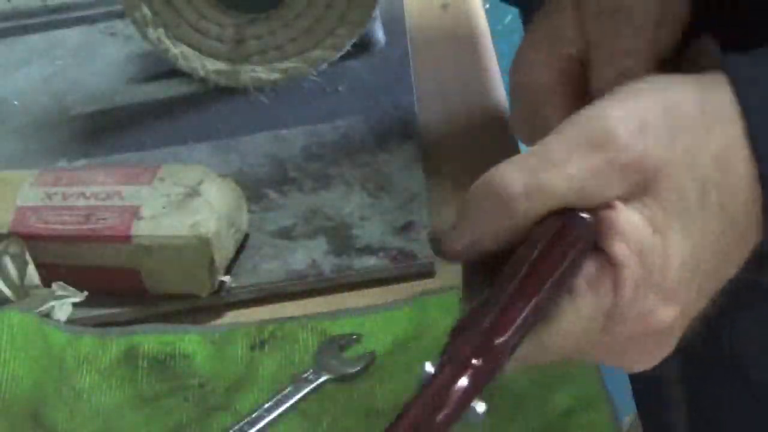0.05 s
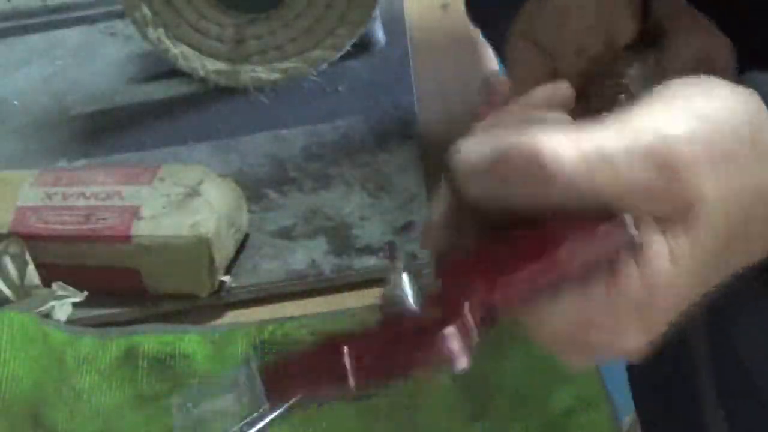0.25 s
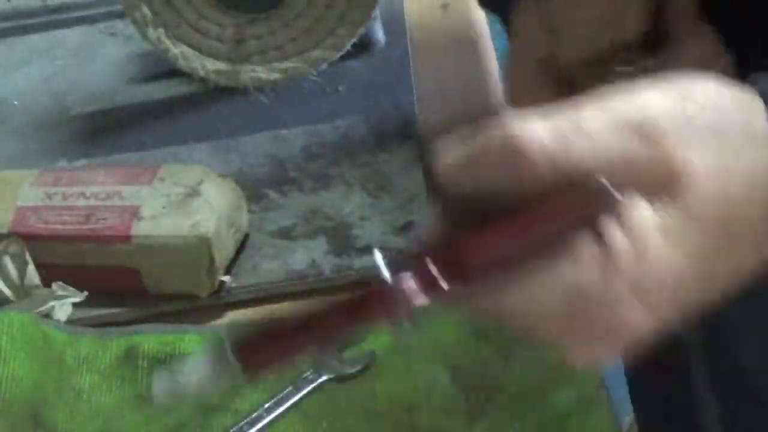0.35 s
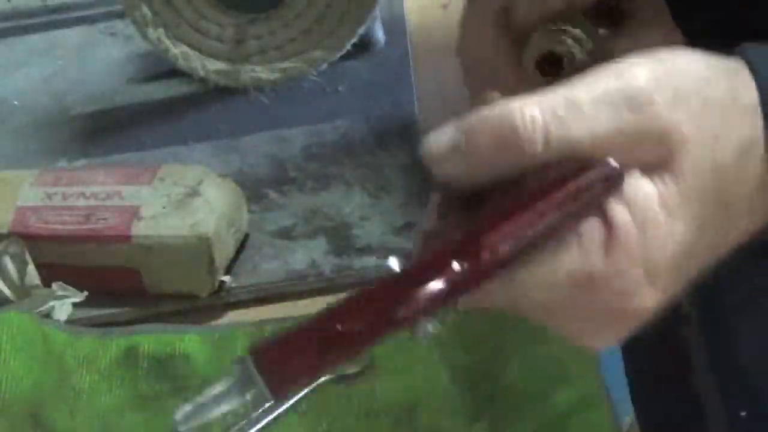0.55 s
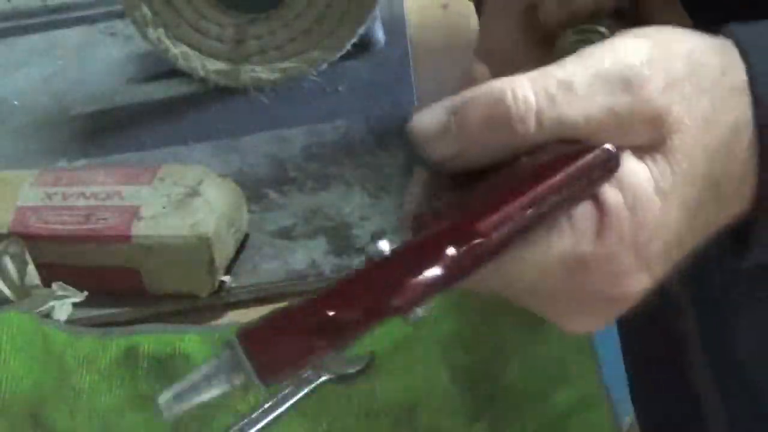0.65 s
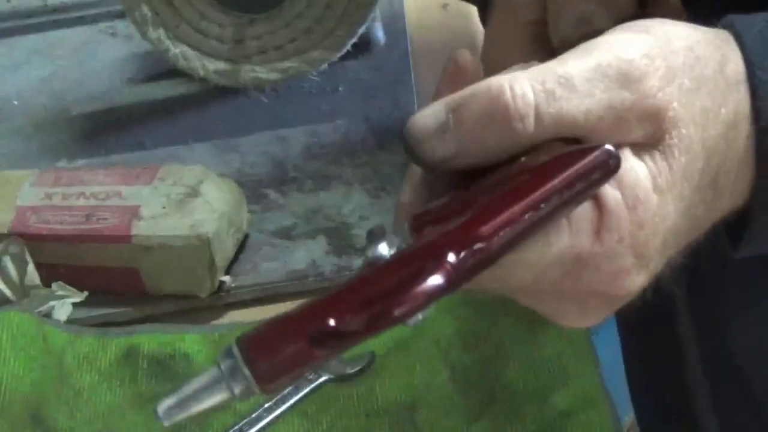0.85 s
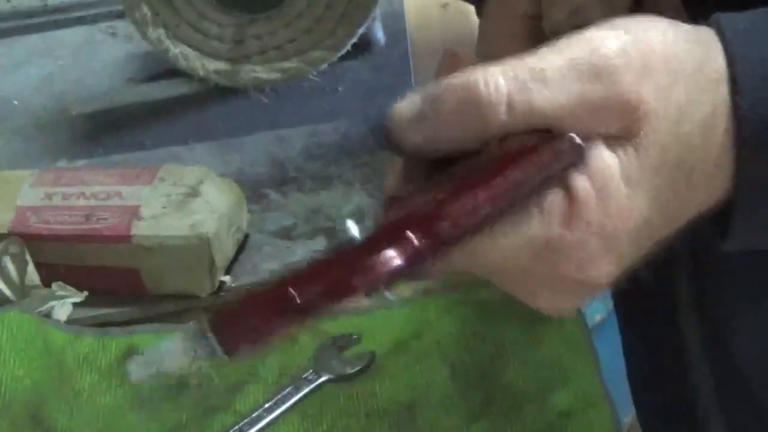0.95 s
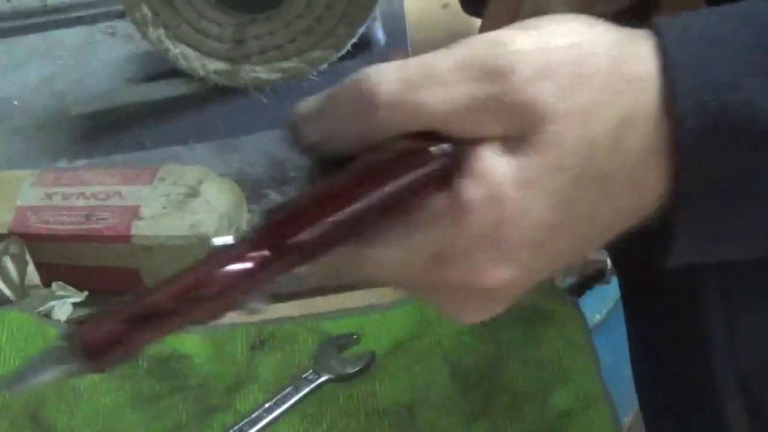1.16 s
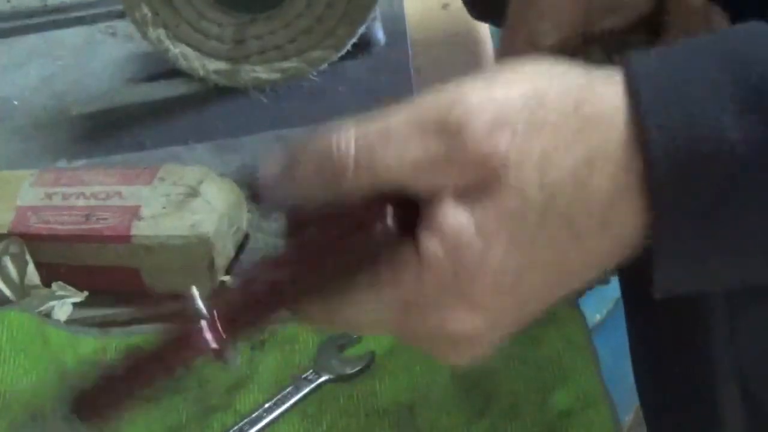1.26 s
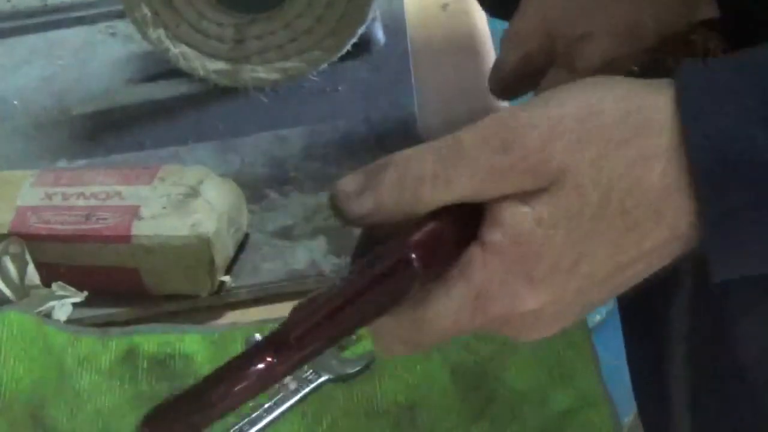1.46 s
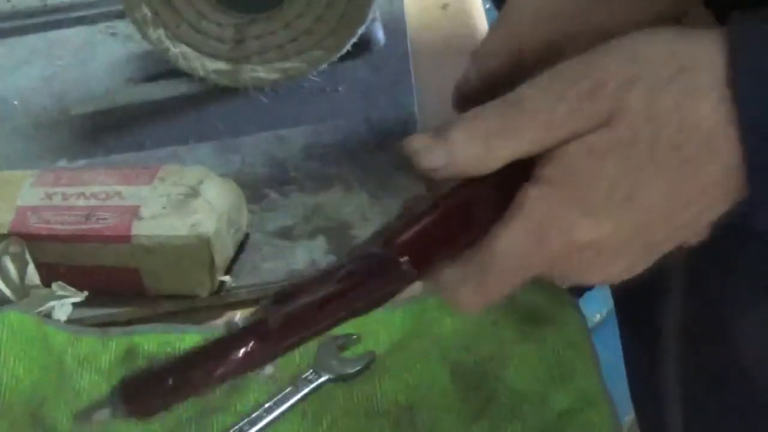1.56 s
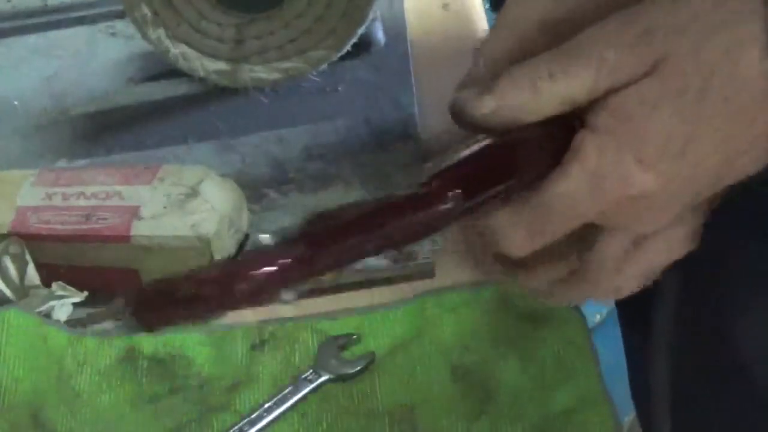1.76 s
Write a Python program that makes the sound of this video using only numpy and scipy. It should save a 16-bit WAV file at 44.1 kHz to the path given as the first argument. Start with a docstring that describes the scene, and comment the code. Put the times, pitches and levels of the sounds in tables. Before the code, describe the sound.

An air gun is pushed onto a leaking hose coupling in a quiet workshop: a whistling hiss, a short burst of air, then ringing metal clicks. The soft hiss continues and grows after a quick steel scrape.

```python
"""An air blow gun is pushed onto a hose coupling over a workbench in a small, quiet workshop.
First the leaking seal hisses and whistles. As the plug seats, the whistle stops and a short puff
of air rings the hollows of hose and gun. Then the steel sleeve is worked: it clicks and clacks
against the plug, and the metal rings. Air keeps seeping past the seal, and near the end the gun
is turned with a brief scrape and the hiss grows louder."""
import sys
import numpy as np
from scipy import signal
from scipy.fft import rfft, irfft
from scipy.io import wavfile
from scipy.ndimage import uniform_filter1d

SR = 44100
rng = np.random.default_rng(int(sys.argv[2]) if len(sys.argv) > 2 else 0)


def to_wav(sig):
    """Store sig (one row per channel, or 1-D mono) as 16-bit WAV at the path in sys.argv[1].

    Samples outside -1..1 are clipped; the rate is SR.
    """
    pcm = np.clip(np.atleast_2d(sig), -1, 1) * 32767
    pcm = np.round(pcm).astype(np.int16)
    wavfile.write(sys.argv[1], SR, pcm.T)  # frames by channels


N = 79380
TIME_S = np.arange(N) / SR
BIN_HZ = np.arange(N // 2 + 1) * SR / N
CUTOFF_HZ = 11050
AIR_SIDE_DB, CONTACT_SIDE_DB = -8.5, -14  # stereo width: side level against mid


def from_db(db):
    """Decibels to gain."""
    return 10 ** (np.asarray(db) / 20)


def automation(rows):
    """One curve for each column after the time, in straight lines between the rows."""
    times_s, *columns = np.transpose(rows)
    return [np.interp(TIME_S, times_s, column) for column in columns]


def eq_db(curve, hz):
    """Read an EQ curve on a log-frequency axis."""
    points_hz, points_db = np.transpose(curve)
    return np.interp(np.log(np.maximum(hz, 1)), np.log(points_hz), points_db)


def drift(rate_hz):
    """Random modulation with a spread of 1, rolling off above rate_hz."""
    smooth = irfft(rfft(rng.standard_normal(N)) / (1 + (BIN_HZ / rate_hz) ** 2), N)
    return smooth / smooth.std()


def wavering_tone(pitch_hz, spread_hz, rate_hz):
    """A sine whose pitch wanders."""
    return np.sin(2 * np.pi * np.cumsum(pitch_hz + spread_hz * drift(rate_hz)) / SR)


def stereo(mid, side, side_db):
    """Mid and side to left and right."""
    return mid + from_db(side_db) * side * np.array([[1], [-1]])


def noise(spectrum, side_db, tint=None):
    """Stereo noise shaped to a spectrum, its mid at rms 1 before the optional tint EQ."""
    gain = from_db(eq_db(spectrum, BIN_HZ)) * (BIN_HZ < CUTOFF_HZ)
    gain = gain / np.sqrt(np.mean(gain ** 2))
    if tint is not None:
        gain = gain * from_db(eq_db(tint, BIN_HZ))
    mid, side = irfft(rfft(rng.standard_normal((2, N))) * gain, N)
    return stereo(mid, side, side_db)


def envelope(start_s, attack_s, hold_s, t60_s):
    """Linear attack, hold, exponential decay."""
    age_s = TIME_S - start_s
    decay_db = -60 * np.clip((age_s - attack_s - hold_s) / t60_s, 0, 3)
    return np.clip(age_s / attack_s, 0, 1) * from_db(decay_db)


# Spectrum of the workshop's background: freq_hz, gain_db
ROOM_TONE_EQ = [(20, -14), (45, -2), (100, 2.5), (150, -7), (250, -9), (500, -13), (1000, -14.5),
                (2000, -16.5), (5000, -48), (11000, -28)]

def room_tone():
    """The bed: a low murmur of air in the workshop."""
    return from_db(-53.5) * noise(ROOM_TONE_EQ, side_db=-10.5)


# Airy whistles in the seal's gap: start_s, hold_s, pitch_hz, half_width_hz, level_db
GAP_TONES = [(0, 0.31, 3990, 50, -56), (0, 0.06, 2500, 70, -55), (0.135, 0.11, 1824, 60, -52.5),
             (0.016, 0.17, 9670, 150, -52), (1.083, .22, 4600, 109, -53), (1.083, .32, 4030, 90, -57),
             (1.61, 0.13, 8480, 220, -48), (1.622, .17, 3310, 200, -50), (1.683, .13, 2440, 90, -54.5)]

def gap_tones():
    """Narrow resonances colour the escaping air, coming and going as the gap in the seal changes."""
    out = 0
    for start_s, hold_s, pitch_hz, half_width_hz, level_db in GAP_TONES:
        resonance = 1 / (1 + ((BIN_HZ - pitch_hz) / half_width_hz) ** 2)
        air = irfft(rfft(rng.standard_normal((2, N))) * resonance, N)
        swell = envelope(start_s, 0.015, hold_s, t60_s=0.15)
        out += from_db(level_db) * swell * stereo(*air / air.std(), AIR_SIDE_DB)
    return out


# Level ride of the leak's two layers: time_s, hiss_db, sizzle_db
LEAK_LEVELS = [(0, -44, -57), (.22, -44.5, -61), (.38, -48.5, -52), (.60, -46.5, -50.5), (.80, -46.5, -58),
               (1.05, -46.5, -55.5), (1.25, -47, -51.5), (1.46, -47, -53.5), (1.51, -46, -42),
               (1.62, -43, -42.5), (1.73, -42.5, -43), (1.8, -42, -67)]
# Spectra of the broad hiss and the sizzle on top: freq_hz, gain_db
HISS_EQ = [(300, -8), (1900, -9.5), (2500, -1.5), (2900, -3.5), (3400, -1.5), (4000, 2), (4300, -0.5),
           (4650, 2), (5300, -1), (6500, -2), (7100, -2), (8500, -4.5), (11000, -1.5)]
SIZZLE_EQ = [(300, -66), (5000, -7), (7000, -7.5), (8400, -3), (9500, 4), (10300, 1.5), (11000, -9)]

def seal_hiss():
    """Air seeps past the seal in a bright hiss that flutters slightly."""
    hiss_db, sizzle_db = automation(LEAK_LEVELS)
    hiss = from_db(hiss_db) * noise(HISS_EQ, AIR_SIDE_DB)
    sizzle = from_db(sizzle_db) * noise(SIZZLE_EQ, AIR_SIDE_DB)
    flutter_db = 0.5 * drift(rate_hz=30.2)
    return (hiss + sizzle) * from_db(flutter_db)


# Level ride of the seal's whistle: time_s, level_db
WHISTLE_LEVELS = [(0, -44), (.02, -56), (.04, -39.5), (.09, -44), (.135, -37.5), (.152, -53), (.175, -39.5),
                  (.205, -50), (.236, -40.5), (.246, -90)]

def seal_whistle():
    """The seal gives a thin, high whistle while the plug is half in."""
    level_db, = automation(WHISTLE_LEVELS)
    return np.sqrt(2) * from_db(level_db) * wavering_tone(pitch_hz=8481, spread_hz=8, rate_hz=48)


# Strokes of the turning sleeve: start_s, hold_s, level_db
SCRAPE_STROKES = [(1.513, 0.013, -30), (1.540, 0.0095, -30)]
# Spectrum of the rubbing steel: freq_hz, gain_db
SCRAPE_EQ = [(200, -37), (1000, -37), (1500, 2.5), (1900, -14), (2350, 9), (2750, -13), (3400, 6.5),
             (4600, -6.5), (5600, -5), (6400, 2), (7300, -13), (11000, 4)]

def sleeve_scrape():
    """Steel rubs on steel with a gritty texture as the sleeve turns."""
    strokes = sum(from_db(level_db) * envelope(start_s, 0.0036, hold_s, t60_s=0.042)
                  for start_s, hold_s, level_db in SCRAPE_STROKES)
    grit = from_db(-drift(rate_hz=700))
    return strokes * grit * noise(SCRAPE_EQ, CONTACT_SIDE_DB)


# Air resonances of hose and gun: start_s, pitch_hz, level_db, attack_s, hold_s, t60_s
HOLLOW_TONES = [(0.25, 110.9, -30.5, .02, 0.022, 0.28), (.256, 292, -28, 0.015, 0.022, .14),
                (.257, 1026, -33, 0.0035, 0.017, 0.13), (0.252, 1153, -24, .003, 0.021, 0.25),
                (0.266, 3003, -20.5, 0.0035, 0.0099, 0.065)]

def hollow_ring():
    """The puff sets the hollows of hose and gun ringing, each unsteady in pitch."""
    out = 0
    for start_s, pitch_hz, level_db, *shape in HOLLOW_TONES:
        tone = wavering_tone(pitch_hz, spread_hz=0.01 * pitch_hz, rate_hz=68.6)
        out += from_db(level_db) * envelope(start_s, *shape) * tone
    return out


# Spectra of the puff's four layers, in order of entry: freq_hz, gain_db
SPIT_EQ = [(200, -25), (700, -14), (1300, 9), (2500, -13), (5500, -16), (7500, -14), (11000, -13)]
JET_FRONT_EQ = [(100, -22), (2500, -10), (3500, -2), (4500, -9), (5400, -1), (7000, -7), (9200, -1),
                (10400, 5.5), (11000, 1)]
JET_EQ = [(30, -22), (100, -10), (400, 1), (800, -7), (2000, -2.5), (3500, 1), (5000, -3), (8000, -1),
          (10300, 3.5), (11000, -8)]
RUSH_EQ = [(30, -14), (70, 5), (170, 2), (230, -9.5), (400, -2.5), (520, -15), (750, -4), (950, -3.5),
           (1110, 9), (1270, -6.5), (1450, -6.5), (1850, -1.5), (2300, 1), (2800, -11), (3000, 7),
           (3200, -11), (3800, -1), (4300, -3.5), (4650, 2.5), (5100, -6), (6200, -3.5), (8000, -11),
           (11000, -13)]

def seating_puff():
    """As the plug seats, air spits, jets out with a hard, bright front and rushes through hose and gun."""
    spit = from_db(-19) * noise(SPIT_EQ, AIR_SIDE_DB)
    spit *= envelope(start_s=0.2382, attack_s=0.00018, hold_s=0.0011, t60_s=0.0054)
    front = from_db(-22) * noise(JET_FRONT_EQ, AIR_SIDE_DB)
    front *= envelope(start_s=0.243, attack_s=0.0013, hold_s=0.009, t60_s=0.024)
    jet = from_db(-21.5) * noise(JET_EQ, AIR_SIDE_DB)
    jet *= envelope(start_s=0.243, attack_s=0.0025, hold_s=0.0091, t60_s=0.24)
    rush = from_db(-19) * noise(RUSH_EQ, side_db=-6)
    rush *= envelope(start_s=0.249, attack_s=0.011, hold_s=0.026, t60_s=0.19)
    return spit + front + jet + rush


# Ringing modes of gun and coupling: pitch_hz, gain_db, t60_s
METAL_MODES = [(1158.6, -15.5, 0.14), (1856, -13, 0.11), (2100, -16.5, 0.14), (2243, -7.5, 0.085),
               (2375, -6, 0.074), (2555, -16.5, .12), (2755, -32, 0.14), (2795, -18, 0.18),
               (2985, -8.5, 0.14), (3174, -5.5, 0.082), (4090, -18.5, 0.16), (4610, -14.5, 0.097),
               (4780, -21, 0.23), (5730, -18.5, 0.13), (6560, -19, 0.12), (8300, -21, 0.15)]

def metal_ring(start_s, tint):
    """The metal rings on after one knock, each mode struck with a strength of its own."""
    ring, age_s = np.zeros((2, N)), TIME_S[:SR // 3]
    for pitch_hz, gain_db, t60_s in METAL_MODES:
        scatter_db = 1.5 * rng.standard_normal()
        strength = from_db(gain_db + eq_db(tint, pitch_hz) + scatter_db)
        waves = np.sin(2 * np.pi * (pitch_hz * age_s + rng.random((2, 1))))
        ring[:, :len(age_s)] += strength * waves * from_db(-60 * age_s / t60_s)
    mid, side = np.pad(ring, ((0, 0), (int(start_s * SR), 0)))[:, :N]
    return stereo(mid, side, side_db=-13.5)


# Spectrum of the many short-lived modes in a contact's crack: freq_hz, gain_db
CRACK_EQ = [(100, -33.5), (500, -24.5), (850, -22.5), (1120, -1.5), (1350, -20), (1520, -16), (1700, -15),
            (2250, -0.5), (2620, -7), (3100, 0.5), (3750, -11.5), (4550, 1), (5200, -12.5), (5850, -8.5),
            (6500, -11), (7150, -17.5), (8050, -8), (9000, -17.5), (9500, -9.5), (11000, -23)]
# Knocks of sleeve on plug: start_s, level_db, crack_t60_s, ring_db, then tint_db for each tint band
SLEEVE_KNOCKS = [(0.4149, -12.5, 0.02, 2.5, -28, -27, -12.5, -1, -10.5, -1),
                 (0.4206, -22, 0.078, 0, -19, -23, -24, -3, -12, -8),
                 (0.4338, -20.5, 0.038, -1.5, -25, -11, -3.5, 4, -12, -11),
                 (0.445, -19, 0.07, -4.5, -29, -14, -4, -5, -14, -12),
                 (0.4506, -19, 0.069, -3.5, -28, -22, -12, -5.5, -12.5, -10),
                 (.6236, -19, 0.027, 4, -22, -6.5, 0.5, 1.5, 12.5, 13.5),
                 (0.648, -28, 0.026, 1, -16, 4, 9, 0, -8, -9),
                 (0.6599, -15.5, 0.037, -5.5, -8, -2, 2, 3, -0.5, -13),
                 (0.8476, -15, 0.047, 2.5, 3, 1, -8, -7.5, -13.5, -12),
                 (0.9049, -16.5, 0.026, -1.5, -13, -4.5, -0.5, 1, 4, -7),
                 (0.933, -31, 0.072, -6, 5, 4.5, 4, -5, -10, -12),
                 (0.9474, -24.5, 0.073, -11, -7, -3, 1, -3, -12, -12),
                 (.9570, -16, .019, -3, 0, 1, -0.5, 4.5, -19, -15),
                 (0.9665, -19.5, 0.03, -3.5, -10, 3.5, 4.5, 0.5, 5, 1),
                 (0.9841, -26, .03, -5.5, 10.5, -3, -11, -11, -12, -15),
                 (1.524, -39, 0.022, -2, -10, -12, -8, 15, 10, 9),
                 (1.549, -28.5, 0.023, -9, -10, -14, -8, 3.5, -6, 9),
                 (1.5873, -42.5, .02, -3, -12, -10, -2, 9, -3, 25)]
TINT_BANDS_HZ, TINT_PIVOT_HZ = [500, 1100, 1900, 4500, 8000, 10000], 2900

def sleeve_clicks():
    """Sleeve and plug knock together: a short crack, a metal ring and the workshop's brief, duller tail."""
    out = 0
    for start_s, level_db, crack_t60_s, ring_db, *tint_db in SLEEVE_KNOCKS:
        tint = sorted([(TINT_PIVOT_HZ, 0), *zip(TINT_BANDS_HZ, tint_db)])
        dulled = [(hz, db - 2 * np.log2(hz / TINT_PIVOT_HZ)) for hz, db in tint]  # -2 dB per octave
        crack = noise(CRACK_EQ, CONTACT_SIDE_DB, tint)
        crack *= envelope(start_s, attack_s=0.00045, hold_s=0.084 * crack_t60_s, t60_s=crack_t60_s)
        tail = from_db(-12.5) * noise(CRACK_EQ, side_db=-5.5, tint=dulled)
        tail *= envelope(start_s, attack_s=0.0024, hold_s=0, t60_s=0.17)
        ring = from_db(ring_db) * metal_ring(start_s, tint)
        out += from_db(level_db) * (crack + tail + ring)
    return out


def scene():
    """The gun sits just left of centre, over the room tone."""
    steel = sleeve_clicks() + sleeve_scrape()
    puff = seating_puff() + hollow_ring()
    leak = seal_hiss() + seal_whistle() + gap_tones()
    pan = from_db([[0.25], [-0.25]])
    return (steel + puff + leak) * pan + room_tone()


def record(dry):
    """A fast limiter holds the peaks down, then a steep low-pass cuts the top."""
    threshold_db, release_db_per_s = -6, 900
    peak_db = 20 * np.log10(np.abs(dry).max(axis=0) + 1e-9)
    over_db = np.maximum(peak_db - threshold_db, 0)
    release_db = release_db_per_s * TIME_S
    reduction_db = np.maximum.accumulate(over_db + release_db) - release_db
    limited = dry * from_db(-uniform_filter1d(reduction_db, size=24))
    low_pass = signal.ellip(12, 0.1, 70, CUTOFF_HZ, fs=SR, output="sos")
    return signal.sosfilt(low_pass, limited)


dry = scene()
out = record(dry)
to_wav(out)
```